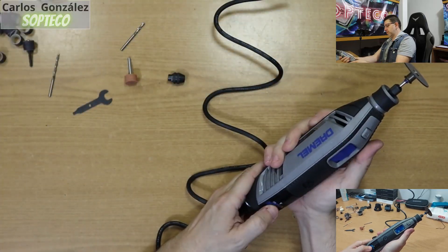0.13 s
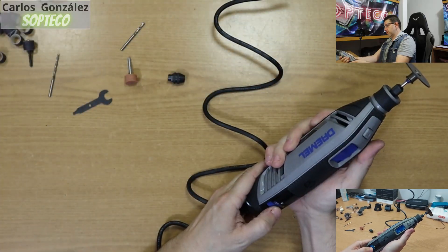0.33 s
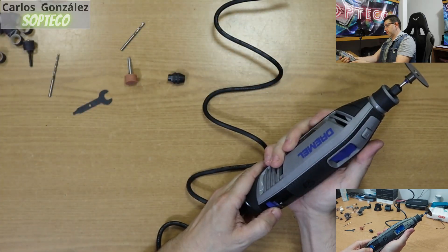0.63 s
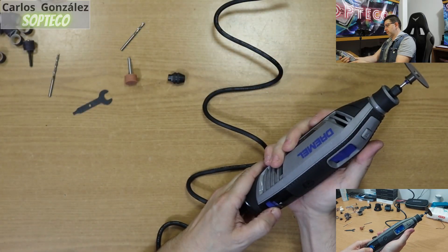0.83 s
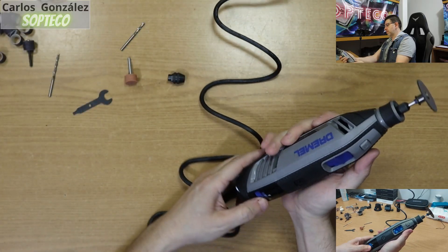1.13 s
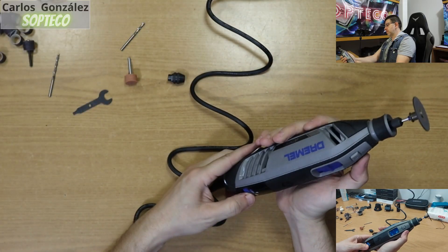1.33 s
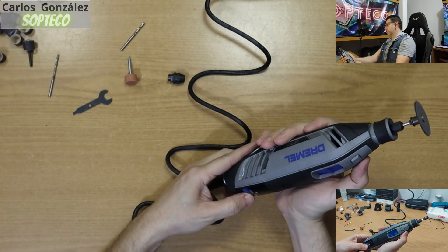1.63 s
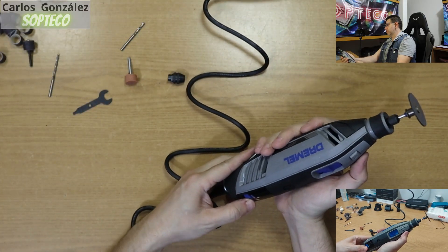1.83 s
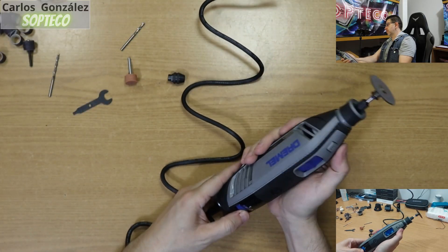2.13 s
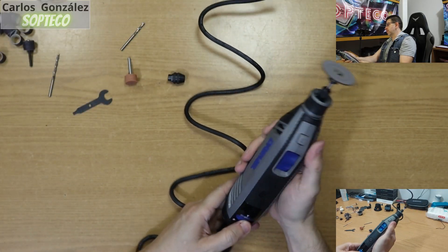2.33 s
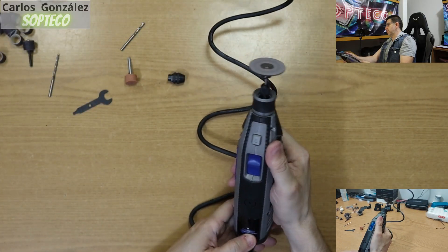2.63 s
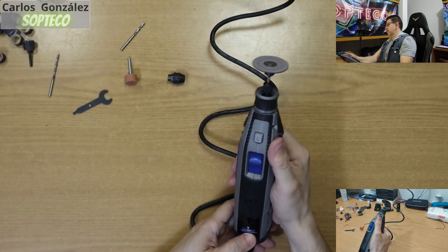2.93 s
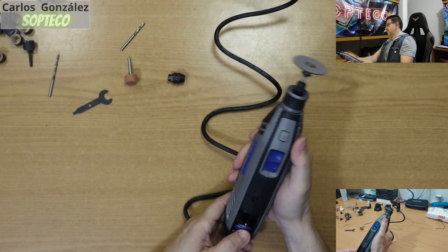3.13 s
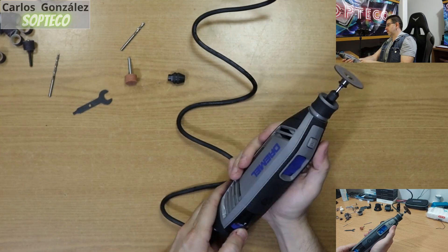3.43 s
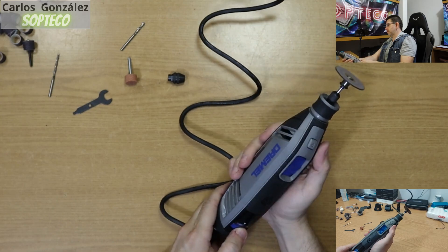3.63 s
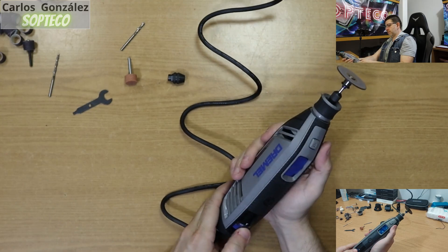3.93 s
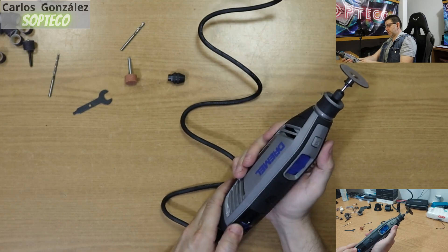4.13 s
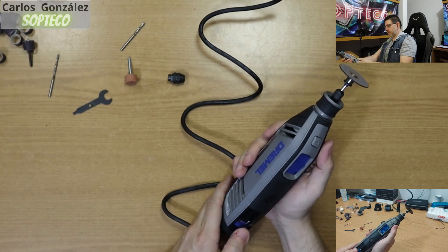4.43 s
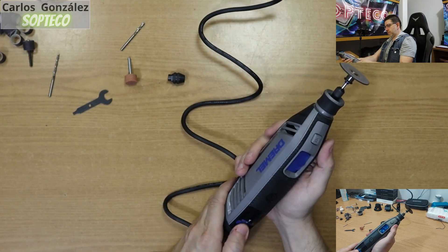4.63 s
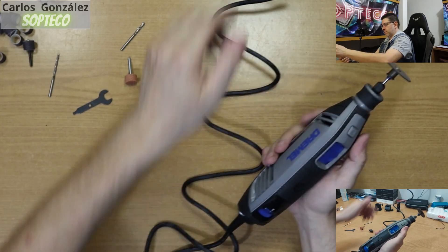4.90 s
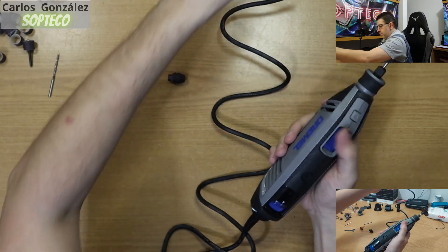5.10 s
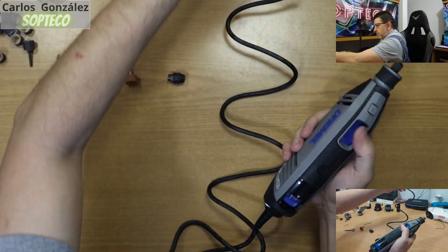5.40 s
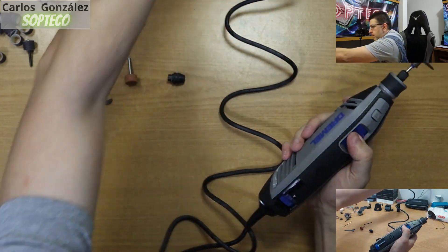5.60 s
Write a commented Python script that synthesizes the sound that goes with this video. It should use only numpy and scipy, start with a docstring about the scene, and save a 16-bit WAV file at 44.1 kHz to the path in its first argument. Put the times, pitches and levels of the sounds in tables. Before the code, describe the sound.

In a small room, close to the microphone, an electric rotary tool surges to full speed in under a second. Its raspy electrical whine grows brighter and duller as the tool is turned in the hands. After switching off, it winds down with falling, blurring whistles and fading air noise. Soft rubbing, a low desk thump, tiny scrapes and one loud plastic click finish it.

```python
"""A rough rising shriek starts it: a handheld rotary tool spins up a cutting disc above a desk in a small room.
The speed control feeds the motor one gulp of current every half cycle of the mains, so its whine buzzes.
The power is cut and the whistles fall as the rotor coasts down; an arm bumps the desk, and something hard clicks.
One shaft angle drives the tones of the tool; air, brushes and desk are shaped noise, bumps and the click are
short rings, and faint hum and hiss lie underneath."""
import sys
import numpy as np
from scipy import signal
from scipy.fft import rfft, irfft
from scipy.io import wavfile
from scipy.ndimage import uniform_filter1d

SR = 44100
rng = np.random.default_rng(int(sys.argv[2]) if len(sys.argv) > 2 else 0)


def file_out(sig):
    """Save sig as 16-bit WAV at sys.argv[1]."""
    # one column per channel
    cols = np.atleast_2d(sig).T
    # limit, then scale
    lim = np.clip(cols, -1, 1)
    pcm = np.round(lim * 32767).astype(np.int16)
    wavfile.write(sys.argv[1], SR, pcm)


N = 254016
TIME = np.arange(N) / SR  # s

# "Relative" levels below are trimmed again where the layers are mixed.
# How the room dies away: (pitch [Hz], time to fall 60 dB [s])
ROOM_DECAY = [(150, 0.28), (1000, 0.24), (3500, 0.46), (8000, 0.3), (15000, 0.031)]

# Sound of the arm and cord sliding on the desk: (pitch [Hz], relative level [dB])
SLIDE_COLOUR = [(62, -11), (85, -12), (120, -8.5), (220, -6.5), (400, -4.5), (800, -6)]
# Bumps on the desk: (time [s], relative level [dB], pitch [Hz], time to fall 60 dB [s])
BUMPS = [(4.961, -11.5, 116, 0.032), (5.042, -25.5, 130, 0.046), (5.232, -31, 190, 0.064)]
# A hard click, then a nearly inaudible sound of the same shape: (time [s], relative level [dB])
CLICKS = [(5.5945, -1.5), (5.638, -41)]
# What the clicking part rings with: (pitch [Hz], relative level [dB], time to fall 60 dB [s])
CLICK_MODES = [(922, -9.5, 0.023), (1864, -6, 0.027), (2114, -7, 0.022), (2640, -29, 0.04),
               (3040, -22, 0.026), (3200, -21, 0.025), (4350, -15, 0.036), (5750, -19, 0.028)]
# Sharp first crack of the click: (pitch [Hz], relative level [dB])
CRACK_COLOUR = [(300, -24), (900, 4.5), (1900, -3), (3200, -3), (5500, 1.5), (8500, -6.5), (12000, -17),
                (16000, -38)]
# First reflections from the desk and the things on it: (pitch [Hz], relative level [dB])
SCATTER_COLOUR = [(700, -12), (2000, 5), (3000, 3), (4500, 5), (7000, -8), (12000, -22)]

# Rush of air and brushes:
# (speed [turns/s], relative fan level [dB], relative housing ring level [dB], relative brush hiss level [dB])
RUSH = [(86, -43.5, -46, -43.5), (119, -40.5, -41.5, -42.5), (200, -33.5, -43.5, -39.5),
        (294, -26.5, -32.5, -33.5), (313, -27, -31, -32)]
# Air roaring in the vents: (pitch [Hz], relative level [dB])
FAN_COLOUR = [(60, -46), (180, -30.5), (300, -19.5), (450, -9.5), (720, -3.5), (840, 2), (890, -1.5),
              (955, 4), (1060, -1.5), (1170, -3), (1228, 1.5), (1300, -8.5), (1500, -10), (2200, -21)]
# Ringing of the housing: (pitch [Hz], relative level [dB])
RING_COLOUR = [(1500, -19), (1900, -5), (2080, 2.5), (2280, 7), (2600, 1), (3000, -1.5), (3500, -7.5)]
# Hiss of the brushes: (pitch [Hz], relative level [dB])
HISS_COLOUR = [(2000, -36), (3200, 1.5), (4200, 2.5), (5000, 0.5), (5800, -6), (7400, -10), (9000, -22),
               (11000, -25.5), (13000, -41), (15600, -55)]
# Rasp of the brushes: (pitch [Hz], relative level [dB])
RASP_COLOUR = [(1200, -12.5), (1800, 3), (2400, 5.5), (3300, 1.5), (4500, 3), (5800, -1), (7400, -12),
               (11000, -34), (15600, -54)]

# Short rubs as the rotor runs out: (middle [s], half length [s], relative level [dB], pitch [Hz])
RUBS = [(5.154, .017, -30, 2700), (5.24, 0.035, -36, 2700), (5.347, .016, -36, 2520),
        (5.437, .028, -35.5, 2520), (5.453, 0.017, -35.5, 3150), (5.49, .03, -43, 2980)]
# Shriek of the slots at the start: (multiple of shaft speed [-], relative level [dB], length [s])
RUN_UP = [(16, -24.5, .044), (24, -37, .03)]
# Resonances of the housing: (centre [Hz], width [Hz], gain [dB])
HOUSING = [(913, 200, -4), (1075, 120, -6), (1490, 110, -10), (1865, 90, -11), (2150, 200, 0.5),
           (2349, 100, 3), (3590, 350, 2.5), (3930, 260, 3), (4650, 400, -6.5), (5280, 510, -6.5),
           (6080, 880, -9), (8100, 800, -20), (11000, 1200, -12)]
# Whistles while coasting, before the housing's gain:
# multiple of shaft speed [-] -> (level [dB], loudest speed [turns/s], change away from it [dB/octave])
COASTING = {5: (-36, 240, -8), 6: (-29, 290, -20), 7.1: (-36.5, 230, -5), 8: (-42, 285, -11),
            9.08: (-27, 260, -10), 11.15: (-41, 200, -5), 13.13: (-38, 170, -9), 14.2: (-45, 200, -7),
            15.2: (-43, 160, -8), 16: (-40, 225, -9), 17.2: (-45, 240, -3), 24: (-36.5, 195, -14),
            26: (-45, 235, -22), 32: (-46, 115, -9), 40: (-50, 125, -1), 48: (-44, 112, -22),
            56: (-50, 105, -12)}
# Armature whistles under power; every eighth multiple also throbs:
# multiple of shaft speed [-] -> (time [s], relative level [dB])
ARMATURE_DRIVEN = {5: [(0, -52), (.13, -39), (.55, -39.5), (.8, -56), (3, -54), (3.4, -46)], 6: [(0, -47),
                   (.8, -47)], 8: [(0, -46), (.05, -37), (.13, -28), (.19, -42), (.6, -40), (.8, -57)],
                   16: [(.04, -52), (.12, -35.5), (.3, -41.5), (.72, -39.5), (.85, -47), (1.5, -45),
                   (2.1, -52), (2.45, -46), (2.8, -49), (3.5, -43)], 17: [(.6, -57), (3.4, -50)],
                   24: [(.9, -57), (2, -63)], 26: [(2.15, -65), (2.45, -52), (2.8, -66), (3.15, -52),
                   (3.4, -62)]}
# Bearing tones under power, off the whole multiples:
# multiple of shaft speed [-] -> (time [s], relative level [dB])
BEARING_DRIVEN = {3.83: [(.6, -52), (.8, -44)], 6.08: [(.6, -56), (.8, -47)], 7.15: [(0, -50), (.8, -36),
                  (3.8, -38)], 8.15: [(.6, -54), (.8, -44)], 9.08: [(0, -40), (.06, -30), (.15, -42),
                  (3.8, -45)], 9.87: [(1, -45), (3.8, -50)], 11.15: [(.66, -52), (.75, -35), (1.05, -35),
                  (1.3, -32), (1.5, -39), (1.85, -40), (2.1, -44), (2.35, -39), (3.8, -44)],
                  15.2: [(1.4, -44), (2.8, -51)]}

# Shaft speed before the coast; it climbs, sags, climbs again and nearly holds: (time [s], speed [turns/s])
POWERED_SPEED = [(0, 204), (.05, 247), (.1, 287), (.15, 303), (.28, 294.5), (.4, 292), (.6, 306),
                 (.68, 315), (.78, 322), (.95, 320.4), (1.85, 320.4), (2.15, 321.1), (3.1, 321.2),
                 (3.3, 319.1), (3.74, 318.8)]
# How the housing radiates the whine: (pitch [Hz], relative level [dB])
WHINE_COLOUR = [(1500, -31), (2050, -29.5), (2200, -10.5), (2320, 6), (2440, 4.5), (2560, 1.5), (2680, 2.5),
                (2800, -1.5), (2920, 6), (3040, 1.5), (3400, -12), (5000, -19)]
# Loudness toward the microphone as the hands turn the tool:
# (time [s], relative whine level [dB], relative housing ring level [dB])
AIM = [(0, -24, 8), (.12, -26, 2.5), (.2, -27, -1.5), (.55, -23.5, -2), (.78, -24.5, 0), (1.02, -24, -2),
       (1.22, -17, 2.5), (1.42, -14, 1), (1.65, -16.5, -2.5), (1.84, -17, -2), (1.98, -21, -3.5),
       (2.22, -19.5, -1), (2.5, -21, -0.5), (2.72, -18, 1), (3.05, -18, 1.5), (3.45, -18, 1),
       (3.8, -19, 1.5)]
# Echoes of the whine, shifting as the tool moves and favouring one partial after another:
# (time [s], near delay [ms], far delay [ms])
ECHOES = [(.8, 1.13, 5.91), (1.02, 1.14, 5.84), (1.22, 1.08, 5.9), (1.42, 1.1, 5.91), (1.65, 1.14, 5.89),
          (1.83, 1.16, 5.91), (2, 1.06, 6.02), (2.22, 1.08, 5.98), (2.5, 1.09, 5.84), (2.7, 1.17, 5.87),
          (2.9, 1.14, 5.93), (3.12, 1.18, 5.88), (3.3, 1.13, 5.96), (3.5, 1.1, 5.98), (3.72, 1.13, 5.98)]

GULP_HZ = 120  # two gulps of current in each mains cycle
POWER_OFF_S = 3.8  # middle of the fade from powered to coasting sounds
# the coast: start [s], time constant [s], bend of the decay, speed it heads for [turns/s]
COAST_FROM_S, COAST_S, COAST_BEND, CRAWL_HZ = 3.7323, 1.0396, 1.3728, 58.07
STEADY = 0.027  # slot pull that stays on between gulps, against a gulp's peak of 1
NEAR_ECHO, FAR_ECHO = 0.35, 0.3  # gains against the direct whine
# once-a-turn hum: relative level at full speed, growth with speed, slow easing
FULL_SPEED_HZ, HUM_DB, HUM_DB_PER_OCTAVE, HUM_DB_PER_S = 320, -30.5, 35, -1
HUM_RISE_S = 0.092  # the shaking takes a moment to build
DIP_S, DIP_HALF_S, DIP_DB = 3.84, 0.038, -23  # the hum dips briefly
SLIDE_S, SLIDE_RISE_S, SLIDE_DB, SLIDE_DB_PER_S = 4.74, 0.086, -38, -2.5
SCATTER_DB, SCATTER_T60_S = -13, 0.1
RASP_DRIVEN_DB, RASP_COASTING_DB = -13, -2.5  # against the hiss
CAGE_CREEP = 0.0754  # turns the bearing cages creep round in one turn of the shaft
RUB_WIDTH_HZ, RUB_PULSING = 180, 0.87
SPENT_S, SPENT_DB_PER_S = 5.4, -45  # the last fade of the coasting whistles
EDGE_HZ = 15750  # upper limit of the sound


def amp(db):
    """Turns decibels into a gain."""
    return 10 ** (np.asarray(db) / 20)


def unit(x):
    """Scales a sound to an average (rms) strength of 1."""
    return x / np.sqrt(np.mean(x ** 2) + 1e-20)


def curve(rows, order=1):
    """Reads one column of a time table at every sample."""
    rows = np.array(rows)
    return np.interp(TIME, rows[:, 0], rows[:, order])


def read(points, hz):
    """Reads a pitch table, with pitch spaced in octaves."""
    table_hz, value = np.transpose(points)
    return np.interp(np.log(hz + 1), np.log(table_hz), value)


def colour(x, points):
    """Filters a sound to the given spectrum, without sounding early; it falls away beyond the table's ends."""
    hz = np.maximum(abs(np.fft.fftfreq(8192, 1 / SR)), 5)
    octaves_out = abs(np.log2(hz / np.clip(hz, points[0][0], points[-1][0])))
    gain_db = np.maximum(read(points, hz) - 18 * octaves_out, -90)
    log_gain = np.log(amp(gain_db))
    # minimum phase: the energy comes as early as it can
    response = np.exp(np.conj(signal.hilbert(log_gain)))
    taps = np.fft.ifft(response).real[:4096]
    return signal.oaconvolve(x, taps)[:N]


def drift(rate_hz):
    """Random wander of rms 1, made from noise with its fast changes smoothed away."""
    steps = TIME[::32]
    hz = np.fft.rfftfreq(8192, steps[1])
    smoothing = np.exp(-(hz / rate_hz) ** 2)
    slow = irfft(rfft(rng.standard_normal(8192)) * smoothing)
    return unit(np.interp(TIME, steps, slow[:len(steps)]))


def noise(points):
    """Coloured noise of rms 1."""
    return unit(colour(rng.standard_normal(N), points))


def ring(s, hz, t60):
    """A tone struck at time s that falls 60 dB in t60 seconds."""
    age = np.maximum(TIME - s, 0)
    return amp(-60 * age / t60) * np.sin(2 * np.pi * hz * age)


def swell(s, half):
    """A smooth bump of height 1 around time s."""
    return np.exp(-((TIME - s) / half) ** 2)


def fuzzy(phase, width_hz):
    """A narrow band of noise, of rms about 1, that follows a tone."""
    return drift(width_hz) * np.sin(phase) + drift(width_hz) * np.cos(phase)


def gulps(lag, sharp):
    """One smooth pulse every half cycle of the mains; lag is a share of that half cycle."""
    return np.exp(sharp * (np.cos(2 * np.pi * (GULP_HZ * TIME - lag)) - 1))


def floor():
    """Faint mains hum, made of two steady tones, and microphone hiss."""
    mains = 2 * np.pi * GULP_HZ * TIME
    hum = amp(-59.5) * np.sin(mains) + amp(-56.5) * np.sin(3 * mains)
    hiss = noise([(30, -25), (110, -14.5), (300, -8.0), (4000, -11.5), (15000, -30.5)])
    return hum + amp(-48.0) * hiss


def room(x):
    """Sparse random reflections, each band of pitch dying away at its own pace."""
    size = SR // 2
    chosen = rng.random(size) < 12000 / SR
    late_enough = np.arange(size) > 0.003 * SR
    taps = rng.standard_normal(size) * chosen * late_enough
    hz, t, bands = signal.stft(taps, SR, nperseg=256)
    decay = amp(-60 * t / read(ROOM_DECAY, hz)[:, None])
    tail = signal.istft(bands * decay, SR, nperseg=256)[1]
    return signal.oaconvolve(x, tail / np.linalg.norm(tail))[:N]


def desk():
    """The arm slides over the desk as soft noise and bumps it, making short low rings."""
    age = np.maximum(TIME - SLIDE_S, 0)
    slide_db = SLIDE_DB + SLIDE_DB_PER_S * age + 0.84 * drift(rate_hz=38)
    slide = amp(slide_db) * noise(SLIDE_COLOUR) * np.minimum(age / SLIDE_RISE_S, 1)
    bumps = sum(amp(db) * ring(s, hz, t60) for s, db, hz, t60 in BUMPS)
    # keeps the bumps low: trims below 85 Hz and above 400 Hz
    return slide + colour(bumps, [(85, 0.004), (400, 0)])


def clicks():
    """A crack of a few milliseconds, a short ring of hard plastic and a spray of near reflections."""
    out = np.zeros(N)
    for s, db in CLICKS:
        age = np.maximum(TIME - s, 0)
        rise = age / 0.00066
        crack = colour(rng.standard_normal(N) * rise * np.exp(1 - rise), CRACK_COLOUR)
        body = np.zeros(N)
        for k, (hz, mode_db, t60) in enumerate(CLICK_MODES):
            body += (-1) ** k * amp(mode_db) * ring(s + 0.00031, hz, t60)
        spray = rng.standard_normal(N) * np.minimum(rise, 1) * amp(-60 * age / SCATTER_T60_S)
        scatter = colour(spray, SCATTER_COLOUR)
        out += amp(db) * (amp(1.0) * crack + body + amp(SCATTER_DB) * scatter)
    return out


def shaft_speed():
    """Turns a second: held by the speed control, then run down by air and friction."""
    coast_age = np.maximum(TIME - COAST_FROM_S, 0)
    left = np.exp(-(coast_age / COAST_S) ** COAST_BEND)
    return CRAWL_HZ + (curve(POWERED_SPEED) - CRAWL_HZ) * left


def chatter(angle, speed):
    """As it slows, the rotor rubs harder at one spot of each turn; a gain of mean power about 1."""
    slack = np.clip((185 - speed) / 60, 0, 1)
    gain = np.exp(0.75 * slack * np.cos(angle))
    return gain / np.sqrt(uniform_filter1d(gain ** 2, size=2000))


def rasp(angle, speed):
    """Brushes scrape much the same roughness every turn: many weak shaft multiples that come and go."""
    scrape = np.zeros(N)
    for k in range(6, 60):
        scrape += drift(rate_hz=4) * np.sin(k * angle + rng.uniform(0, 2 * np.pi))
    return unit(colour(scrape * np.sqrt(speed), RASP_COLOUR))


def rush(angle, speed, power):
    """Cooling air roars in the vents; the brushes ring the housing and hiss, a little more at each gulp."""
    coasting = 1 - power
    speeds, *levels = np.transpose(RUSH)
    fan_db, ring_db, hiss_db = (np.interp(speed, speeds, level) for level in levels)
    aim_db = curve(AIM, order=2)
    fan = amp(fan_db + 0.15 * aim_db - 1.2 + 0.5 * drift(rate_hz=17.0)) * noise(FAN_COLOUR)
    housing_db = ring_db + aim_db + 3.0 - 0.51 * coasting + 1.03 * drift(rate_hz=34)
    housing = amp(housing_db) * noise(RING_COLOUR)
    rasp_db = RASP_DRIVEN_DB * power + RASP_COASTING_DB * coasting
    scrape = noise(HISS_COLOUR) + amp(rasp_db) * rasp(angle, speed)
    hiss = amp(hiss_db + 0.47 * aim_db - 2.6 * coasting) * scrape
    sparking = 1 + power * (0.13 * gulps(lag=0.71, sharp=10.0) - 0.05)
    brushes = (housing + hiss) * sparking * chatter(angle, speed) ** 0.098
    fading = amp(-34 * np.maximum(TIME - 5.55, 0))  # the rotor is nearly spent
    return (fan + brushes) * fading


def rubs(angle, speed):
    """A few brief scrapes, each ringing one resonance and pulsing with each turn of the slow rotor."""
    scrapes = np.zeros(N)
    for s, half, db, hz in RUBS:
        scrapes += amp(db) * swell(s, half) * fuzzy(2 * np.pi * hz * TIME, RUB_WIDTH_HZ)
    return scrapes * chatter(angle, speed) ** RUB_PULSING


def unbalance(angle, speed, ripple_left):
    """The disc shakes the tool once a turn; torque ripple adds sidebands, of which the upper ones radiate."""
    ripple = 2 * np.pi * (GULP_HZ * TIME - 0.25)
    sidebands = amp(-4.5) * np.sin(angle + ripple) + amp(-17.5) * np.sin(angle + 2 * ripple)
    speed_db = HUM_DB_PER_OCTAVE * np.log2(speed / FULL_SPEED_HZ)
    level_db = HUM_DB + speed_db + HUM_DB_PER_S * TIME + DIP_DB * swell(DIP_S, DIP_HALF_S)
    build_up = np.minimum(TIME / HUM_RISE_S, 1) ** 2
    return np.sqrt(2) * amp(level_db) * build_up * (np.sin(angle) + ripple_left * sidebands)


def whistle(phase, wobble, wobble_hz):
    """A tone of rms about 1 that flutters a little in level and phase."""
    flutter = amp(1.2 * drift(rate_hz=25))
    return np.sqrt(2) * flutter * np.sin(phase + wobble * drift(rate_hz=wobble_hz))


def housing_gain(hz):
    """How strongly the housing radiates a tone of this pitch: the sum of its resonance peaks."""
    return sum(amp(db) / (1 + (2 * (hz - centre) / width) ** 2) for centre, width, db in HOUSING)


def gliding(angle, speed):
    """The whistles of the coasting rotor fall through the housing's resonances and blur as it slows."""
    blur = np.minimum(0.25 * (200 / speed) ** 2, 0.45)
    out = np.zeros(N)
    for k, (db, best_speed, db_per_octave) in COASTING.items():
        octaves_away = abs(np.log2(speed / best_speed))
        level = amp(db + db_per_octave * octaves_away) * housing_gain(k * speed)
        out += level * whistle(k * angle, wobble=blur, wobble_hz=17)
    last_fade = amp(SPENT_DB_PER_S * np.maximum(TIME - SPENT_S, 0))
    return out * chatter(angle, speed) * last_fade


def driven(angle):
    """Under power the slot harmonics throb with the current, and the bearing tones pulse with their cages."""
    throb = 2.33 * gulps(lag=0.7, sharp=1.1) + 0.35
    cage = np.cos(CAGE_CREEP * angle)
    armature, bearings = np.zeros(N), np.zeros(N)
    for k, level in ARMATURE_DRIVEN.items():
        pulsing = 1 if k % 8 else throb  # multiples of eight belong to the slots
        armature += amp(curve(level)) * whistle(k * angle, wobble=0.5, wobble_hz=11) * pulsing
    for k, level in BEARING_DRIVEN.items():
        bearings += amp(curve(level)) * whistle(k * angle + 0.8 * cage, wobble=0.3, wobble_hz=12)
    return armature + np.sqrt(1 + 0.85 * cage) * bearings


def run_up(angle):
    """The heavy starting current makes the slots shriek, a rough chirp that rises with the shaft."""
    shriek = np.zeros(N)
    for k, db, length in RUN_UP:
        tone = 0.35 * np.sin(k * angle) + fuzzy(k * angle, width_hz=330)
        shriek += amp(db) * np.exp(-(TIME / length) ** 4) * tone
    return shriek * (0.87 + gulps(lag=0.83, sharp=2.1))


def whine(angle, power):
    """Eight armature slots pull on the stator as hard as each gulp of current drives them; two echoes join."""
    slots = np.sin(8 * angle)
    current = (gulps(lag=0.803, sharp=5.5) + STEADY) * (1 + 0.017 * drift(rate_hz=70))
    current = current / np.sqrt(uniform_filter1d(current ** 2, size=2940))  # keeps its strength even
    direct = amp(curve(AIM) - 3.0) * power * unit(colour(slots * current, WHINE_COLOUR))
    near = np.interp(TIME - curve(ECHOES, order=1) / 1000, TIME, direct)
    far = np.interp(TIME - curve(ECHOES, order=2) / 1000, TIME, direct)
    return direct + NEAR_ECHO * near + FAR_ECHO * far


def scene():
    """One shaft drives every sound of the tool; desk, click, room and floor are added."""
    speed = shaft_speed() * (1 + 0.00023 * drift(rate_hz=8.5))
    angle = 2 * np.pi * np.cumsum(speed) / SR
    power = np.clip((POWER_OFF_S - TIME) / 0.13 + 0.5, 0, 1)
    # the torque ripple dies away more slowly
    ripple_left = np.clip((POWER_OFF_S - TIME) / 0.19 + 1.1, 0, 1)
    click = clicks()
    tones = power * driven(angle) + (1 - power) * gliding(angle, speed)
    motor = whine(angle, power) + unbalance(angle, speed, ripple_left) + rush(angle, speed, power)
    motor += run_up(angle) + rubs(angle, speed)
    echoing = room(amp(-6.5) * tones + amp(-15.5) * click)
    return (floor() + echoing + desk() + click + tones + motor)[None]


def record(dry):
    """Peaks beyond full scale are cut flat, as in an overloaded input; then the highest treble is removed."""
    clipped = np.clip(dry, -1, 1)
    low_pass = signal.firwin(511, EDGE_HZ, window=("kaiser", 9), fs=SR)
    return signal.oaconvolve(clipped, low_pass[None], "same")


dry = scene()
out = record(dry)
file_out(out)
```